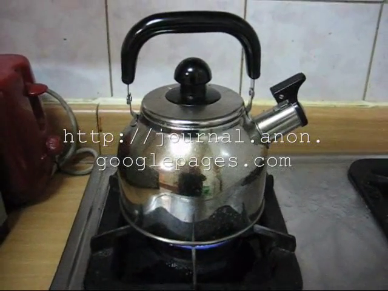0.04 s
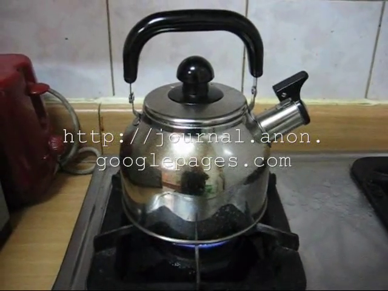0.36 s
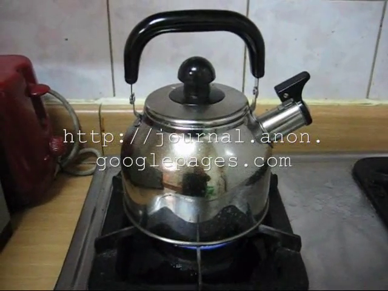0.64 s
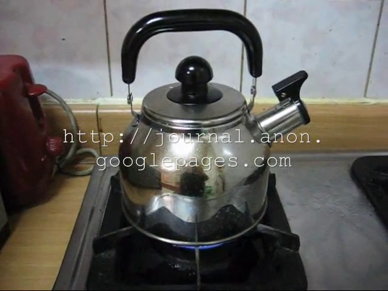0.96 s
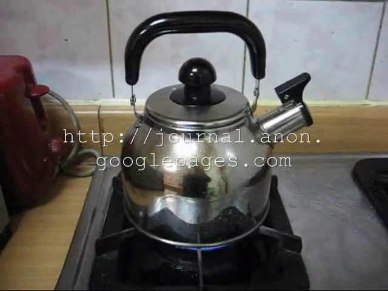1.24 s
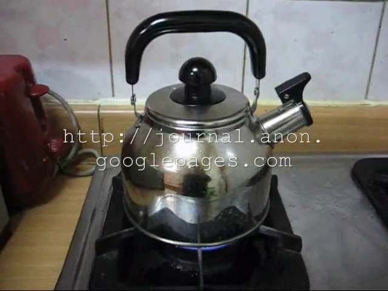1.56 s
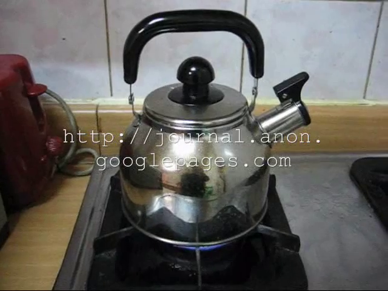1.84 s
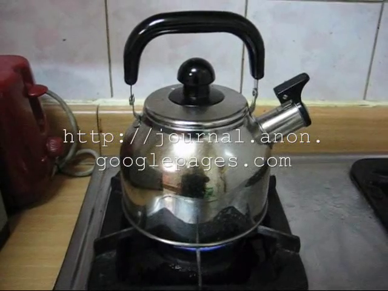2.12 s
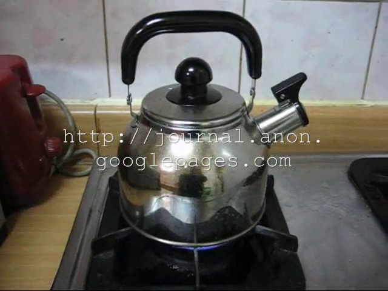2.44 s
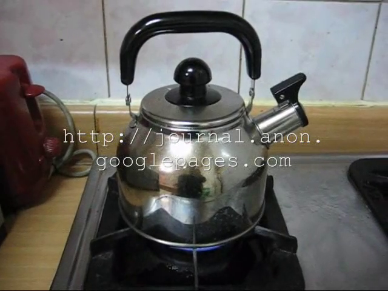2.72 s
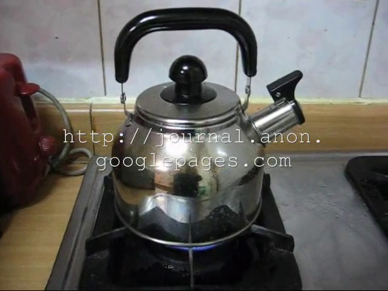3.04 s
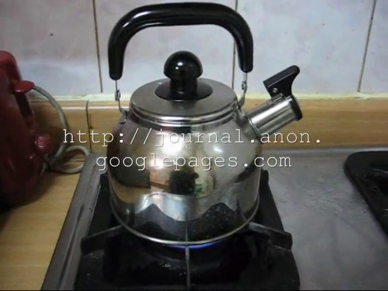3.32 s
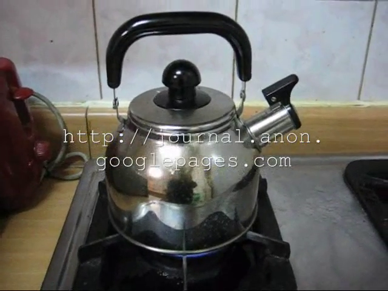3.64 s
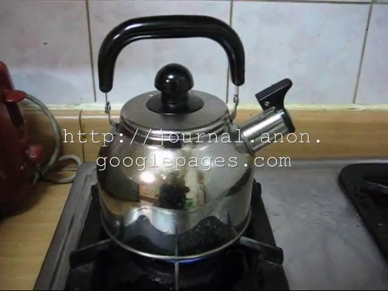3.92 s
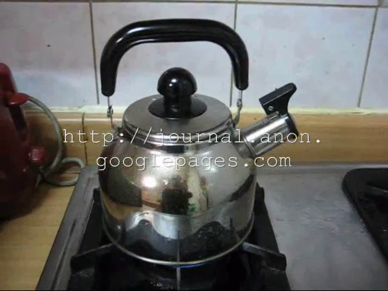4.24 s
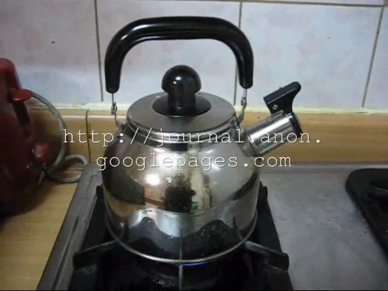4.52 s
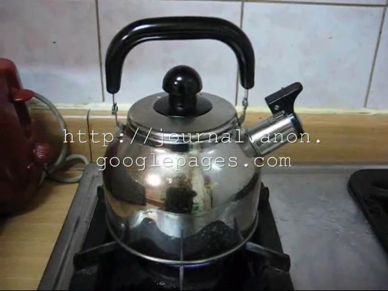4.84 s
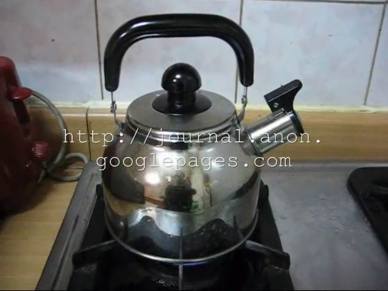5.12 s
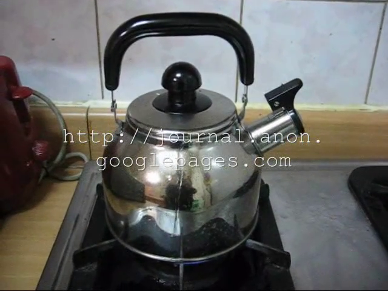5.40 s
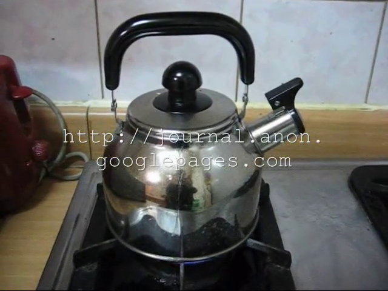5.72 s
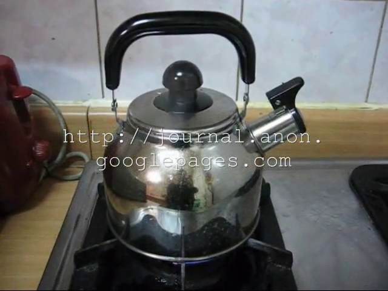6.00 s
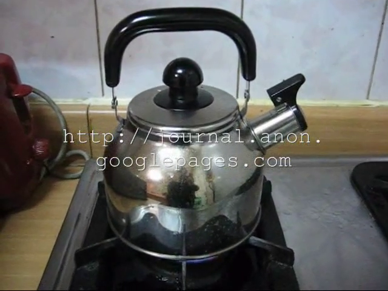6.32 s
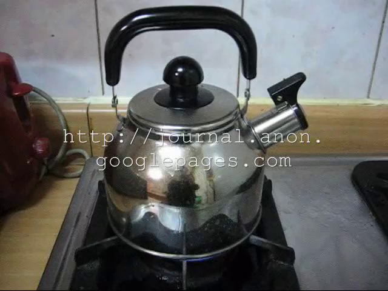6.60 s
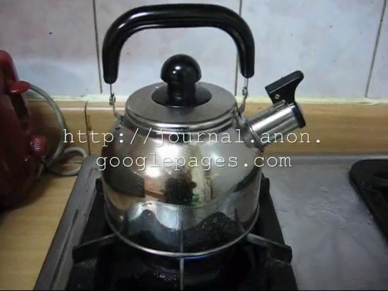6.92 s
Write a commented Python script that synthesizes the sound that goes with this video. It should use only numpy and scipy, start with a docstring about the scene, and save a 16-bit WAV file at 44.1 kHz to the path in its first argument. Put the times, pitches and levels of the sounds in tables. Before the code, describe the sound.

A steel kettle whistles on a gas stove for about seven seconds, heard close in a kitchen with very little echo. From the start there is one very high, fluttering note over a steady steam hiss and the faint low rumble of the burner. From about 0.5 to 1.5 seconds the note breaks repeatedly into a lower, hoarse sputter. It then holds better, with only brief cracks near 1.7, 2.5 and 3.3 seconds. A quick cluster of breaks comes between 4.1 and 4.3 seconds. Near 4.9 seconds the microphone takes one soft, short knock, together with another rasp. The whistle carries on, cracks briefly around 5.6 and 6.5 seconds, and gives a last longer sputter just before 7 seconds. The small microphone lends everything a thin, gritty, slightly metallic edge.

```python
"""A steel kettle on a gas ring in a tiled kitchen, heard close by on a small camera's microphone.
From the start the steam jet sings one fluttering high note over its own hiss and the burner's rumble.
At half a second the note begins to break into a lower, hoarse sputter; after 1.5 s it holds better.
More breaks crowd in just past 4 s, the camera gets one soft knock near 4.9 s, and a last sputter ends it.
Throughout, the camera samples slowly and unfiltered: overtones fold down, mirror tones appear above."""
import sys
import numpy as np
from scipy import signal
from scipy.fft import rfft, irfft
from scipy.io import wavfile
from scipy.ndimage import uniform_filter1d

SR = 44100
rng = np.random.default_rng(int(sys.argv[2]) if len(sys.argv) > 2 else 0)


def generate_wav(sig):
    """Save sig (samples, or channels by samples) to the path in sys.argv[1] as 16-bit PCM at SR."""
    pcm = np.round(np.clip(np.atleast_2d(sig).T, -1, 1) * 32767).astype(np.int16)
    wavfile.write(sys.argv[1], SR, pcm)


N = 315756
TIME = np.arange(N) / SR

# pitch of the spout's note: time_s, pitch_hz
NOTE_PITCH = [(0, 4458), (1.0, 4417), (1.13, 4306), (1.21, 4430), (1.82, 4485), (2.27, 4410), (3.6, 4484),
              (3.66, 4315), (3.77, 4500), (4.08, 4530), (4.14, 4393), (4.28, 4654), (4.37, 4460),
              (4.55, 4573), (4.72, 4378), (4.98, 4556), (5.25, 4525), (5.41, 4416), (5.92, 4455),
              (6.04, 4546), (6.45, 4533), (6.72, 4345), (6.82, 4427), (7.16, 4450)]
# relative level of the note between breaks: time_s, level_db
NOTE_LEVEL = [(0, -18.5), (0.26, -21.5), (0.48, -18.5), (1.12, -21), (1.21, -19.5), (1.8, -21.5),
              (2.17, -20.0), (2.63, -19.0), (3.33, -21), (3.73, -20), (4.62, -23.0), (4.9, -22.5),
              (5.33, -24.5), (5.45, -20.0), (5.92, -20.5), (6.0, -21.5), (6.61, -25), (6.68, -17),
              (6.8, -23.0), (7.16, -24.0)]
# unsteadiness of the jet, for whistle and hiss alike: time_s, turbulence_db
JET_TURBULENCE = [(0.0, -3), (0.36, 1), (0.47, -4.0), (0.59, 1), (1.28, -3.5), (2.05, 5), (2.18, -4),
                  (3.22, -0.5), (3.35, 1.5), (3.75, -3.5), (4.28, 6), (4.45, -1.5), (5.29, 7.5), (5.42, 0),
                  (5.8, 0), (6.45, 5.5), (6.68, -2), (6.8, 0), (7.16, 0.0)]


def whistle(sway_rate_hz=11, rebound_s=.25):
    """The steam jet sings a note with two overtones in the spout, giving way to sputter in the breaks."""
    turbulence_db = curve(JET_TURBULENCE)
    # the boil sways pitch and level
    pitch_hz = curve(NOTE_PITCH) + 30 * undb(turbulence_db / 2) * flutter(sway_rate_hz)
    sway_db = 1.22 * flutter(sway_rate_hz)
    share, broken_hz, broken_turbulence_db = breaks(pitch_hz)
    phase, tone = jet(pitch_hz, undb(turbulence_db), wander_hz=54, wander_rate_hz=68,
                      jitter_hz=40, eddy_share=.68, eddy_rate_hz=95)
    spout_mode = dict(hz=4340, width_hz=830)
    tone = steady(resonate(resonate(tone, **spout_mode), **spout_mode))
    note = undb(curve(NOTE_LEVEL) + sway_db) * (tone + undb(-24.5) * np.sin(3 * phase))
    # turbulence drives the octave harder, and it flares as the note catches again after a break
    leak = 1 / (rebound_s * SR)
    lately_broken = signal.lfilter([leak], [1, leak - 1], share)
    octave_db = -41.5 + sway_db + .3 * turbulence_db + 5 * lately_broken + 1.3 * flutter(38)
    # it also flares when the warble sweeps it through its air mode, and is first to go in a break
    octave_ring = unit(resonate(np.sin(2 * phase), hz=9130, width_hz=190))
    octave = undb(octave_db) * (1 - share) * octave_ring
    hoarse = undb(-26.3) * sputter(broken_hz, broken_turbulence_db)
    return undb(2) * (np.sqrt(1 - share) * (note + octave) + np.sqrt(share) * hoarse)


def jet(hz, turbulence, wander_hz, wander_rate_hz, jitter_hz, eddy_share, eddy_rate_hz):
    """Phase and sound of a jet tone: boiling warbles it, turbulence shakes it (depths at turbulence 1)."""
    warble = np.sqrt(turbulence) * wander_hz * flutter(wander_rate_hz)
    shake = turbulence * jitter_hz * flutter(300)
    phase = 2 * np.pi * np.cumsum(hz + warble + shake) / SR
    # stray eddies beat against the tone and at times almost cancel it
    eddies = flutter(eddy_rate_hz) + .5j * flutter(eddy_rate_hz)
    swing = 1 + eddy_share * turbulence ** .63 * eddies
    swing /= np.sqrt(1 + np.abs(.7 * swing) ** 2)  # a self-driven oscillation saturates
    return phase, np.imag(swing * np.exp(1j * phase))


# breaks in the note: start_s, end_s, landing_hz, power_share (0-1), turbulence_db
NOTE_BREAKS = [(0.52, 0.523, 5100, 0.7, 6), (0.529, 0.582, 3770, 0.94, 4.5), (.703, 0.718, 4950, 1, 2),
               (0.716, 0.745, 3900, 1, 2.5), (0.778, 0.81, 3900, 0.7, 0.5), (1.03, 1.046, 4900, 0.9, 3),
               (1.282, 1.338, 3850, 0.99, 3), (1.324, 1.345, 4750, 0.94, 7), (1.349, 1.445, 3850, 0.98, 3),
               (1.677, 1.713, 3990, 0.94, -2.5), (2.016, 2.038, 3500, 0.32, -4.5),
               (2.417, 2.454, 4900, 0.9, -2), (2.455, 2.517, 3700, 0.94, 0), (3.192, 3.212, 3345, 1, -4),
               (3.36, 3.383, 3380, 0.72, -0.5), (4.132, 4.147, 5050, .65, 5),
               (4.139, 4.188, 3550, 0.78, 4.5), (4.224, 4.242, 5230, .77, 4), (4.244, 4.258, 3200, .55, 5),
               (4.27, 4.297, 4930, 0.22, -5), (4.304, 4.326, 3400, .75, 1),
               (4.817, 4.878, 3900, 0.88, 10.5), (5.566, 5.606, 3520, 0.78, 7),
               (6.512, 6.53, 3450, 0.73, 6), (6.824, 6.867, 3467, 0.72, 7), (6.867, 6.954, 3785, 1, 2.5),
               (6.957, 6.998, 3470, 0.94, 1)]


def breaks(note_hz, slide_share=.42):
    """Share of the jet's power that has left the note, the pitch it jumps to, and its turbulence in dB."""
    share, hz, turbulence_db = np.zeros(N), note_hz.copy(), np.zeros(N)
    for start_s, end_s, landing_hz, power_share, break_db in NOTE_BREAKS:
        share[(TIME >= start_s) & (TIME < end_s)] = power_share
        since = TIME >= start_s - .004
        # a drop jumps most of the way and slides through the rest
        drop_hz = max(np.interp(start_s, TIME, note_hz) - landing_hz, 0)
        slide_hz = [landing_hz + slide_share * drop_hz, landing_hz]
        hz[since] = np.interp(TIME[since], [start_s, end_s], slide_hz)
        turbulence_db[since] = break_db
    return np.clip(uniform_filter1d(share, size=120), 0, 1), hz, turbulence_db


def sputter(pitch_hz, turbulence_db):
    """Hoarse tone of the broken jet; the deepest breaks land on the spout's low air mode and chirp."""
    _, hoarse = jet(pitch_hz, undb(turbulence_db), wander_hz=60, wander_rate_hz=90,
                    jitter_hz=80, eddy_share=.6, eddy_rate_hz=180)
    return unit(hoarse + undb(-3) * resonate(hoarse, hz=3400, width_hz=200))


# relative spectrum of the hiss at the spout: frequency_hz, density_db
HISS_SPECTRUM = [(700, -31.5), (1000, -6.5), (1400, -8.5), (1900, -1.5), (2200, -9.5), (2500, 1.5),
                 (2850, -1.5), (3500, 2), (4050, 1.5), (4800, 4.5), (5400, 0), (5600, -19)]


def steam():
    """Hiss of the jet; turbulence strengthens it and blows a breathy band just above the note."""
    turbulence_db = curve(JET_TURBULENCE)
    hiss = noise(HISS_SPECTRUM) * undb(-35.3 + .25 * turbulence_db + 1.35 * flutter(45))
    band = dict(hz=4780, width_hz=380)
    breath = unit(resonate(resonate(rng.standard_normal(N), **band), **band))
    return hiss + breath * undb(-38 + 1.2 * turbulence_db + 3.4 * flutter(32))


def knock(time_s=4.8575, contact_s=.00025, yield_s=.00082, body_hz=42, ring_s=.0051):
    """Right at the microphone: a brief contact and a softer push on the camera, which swings back once."""
    click = np.exp(-np.abs(TIME - time_s) / contact_s)
    push = np.exp(-np.abs(TIME - time_s) / yield_s)
    t = TIME[:4096]
    body_ring = np.exp(-t / ring_s) * np.cos(2 * np.pi * body_hz * t + np.pi / 3)
    swing = signal.fftconvolve(push / push.sum(), body_ring)[:N]
    return -(undb(-17) * click + undb(-8) * swing)


# relative spectrum of the gas flame: frequency_hz, density_db
FLAME_SPECTRUM = [(13, -47.5), (22, -18.5), (34, -7.5), (49, -4.5), (63, -4.5), (76, -18.5), (114, 0),
                  (153, -5.5), (179, -11), (244, -18), (281, -11), (349, -16), (377, -16), (747, -19),
                  (900, -16), (1170, -39), (1980, -120)]


def burner(level_db=-46):
    """Low, flickering roar of the gas ring under the kettle."""
    return noise(FLAME_SPECTRUM) * undb(level_db + 1.5 * flutter(12))


def kitchen(direct, early_db=-17, early_s=.005, tail_db=-16, t60_s=.1):
    """Close to the kettle the direct sound leads; quick echoes off hob and tiles and a short tail follow."""
    t = TIME[:SR // 2]
    early, tail = rng.standard_normal((2, len(t))) * (t > .002)
    early *= np.exp(-t / early_s)
    tail *= undb(-60 * t / t60_s)
    response = undb(early_db) * early / np.linalg.norm(early) + undb(tail_db) * tail / np.linalg.norm(tail)
    return direct + signal.fftconvolve(direct, response)[:N]


def undb(db):
    """Decibels to gain."""
    return 10 ** (np.asarray(db) / 20)


def unit(x):
    """Scale to rms 1."""
    return x / np.sqrt(np.mean(x ** 2))


def steady(x, span_s=.12):
    """Scale so that the running rms stays at 1."""
    return x / np.sqrt(uniform_filter1d(x ** 2, int(span_s * SR)) + 1e-12)


def curve(table):
    """A table of time_s, value at every sample."""
    return np.interp(TIME, *np.transpose(table))


def flutter(corner_hz):
    """Random motion of spread 1, mostly in the three octaves below the corner."""
    f = np.arange(N // 2 + 1) * SR / N / corner_hz
    return unit(irfft(rfft(rng.standard_normal(N)) * f / (f + .193) / (1 + f ** 2), N))


def noise(spectrum):
    """Noise of rms 1, coloured by a table of frequency_hz, density_db."""
    hz, db = np.transpose(spectrum)
    f = np.arange(N // 2 + 1) * SR / N + 1e-3
    gain = undb(np.interp(np.log(f), np.log(hz), db, left=-80, right=-80))
    return unit(irfft(rfft(rng.standard_normal(N)) * gain, N))


def resonate(x, hz, width_hz):
    """One resonance, gain 1 at its centre."""
    return signal.lfilter(*signal.iirpeak(hz, hz / width_hz, fs=SR), x)


def scene():
    """Kettle, knock and flame at one microphone near the hob."""
    return (kitchen(whistle()) + steam() + knock() + burner())[None]


def record(dry, hold_samples=4, top_hz=15800):
    """The camera's slow sample and hold folds overtones down and mirrors every tone upward, to top_hz."""
    held = np.repeat(dry[:, ::hold_samples], hold_samples, axis=1)[:, :N]
    return signal.sosfilt(signal.ellip(10, .2, 80, top_hz, fs=SR, output="sos"), held)


dry = scene()
out = record(dry)
generate_wav(out)
```